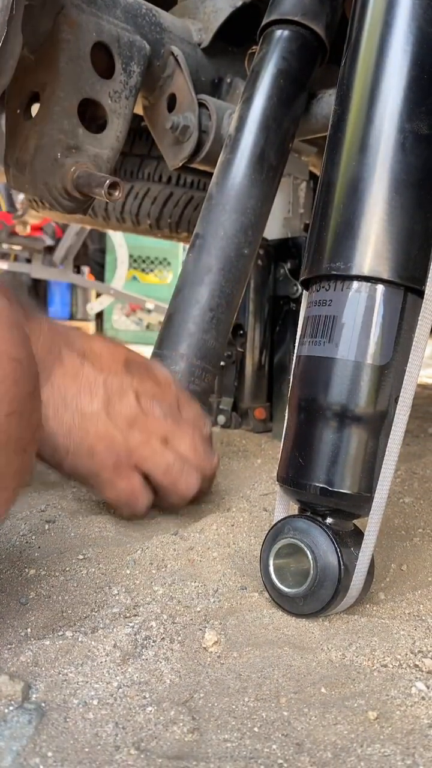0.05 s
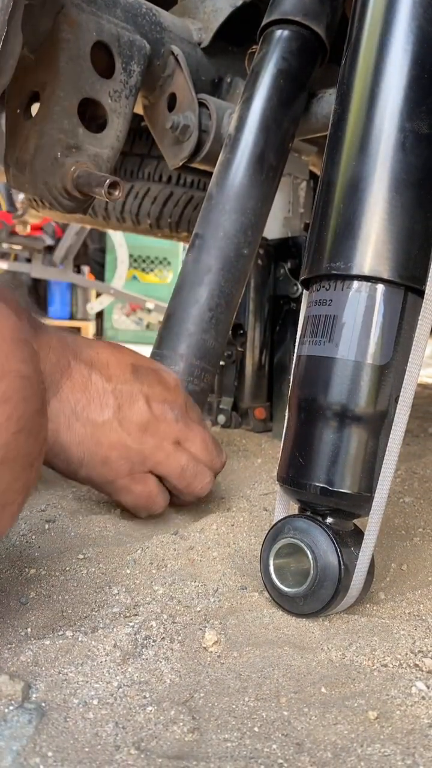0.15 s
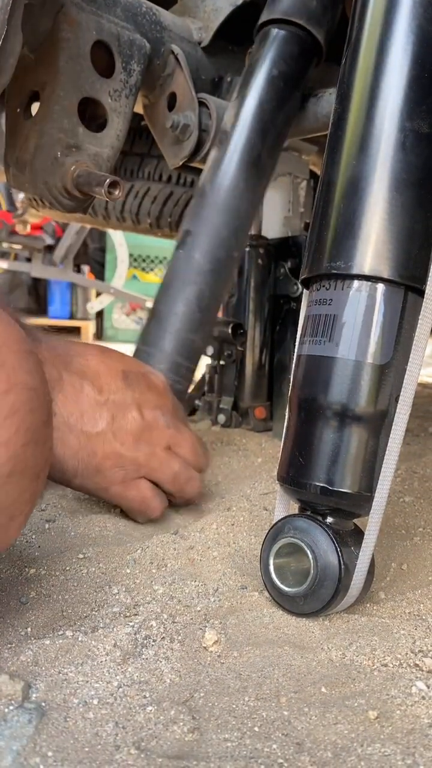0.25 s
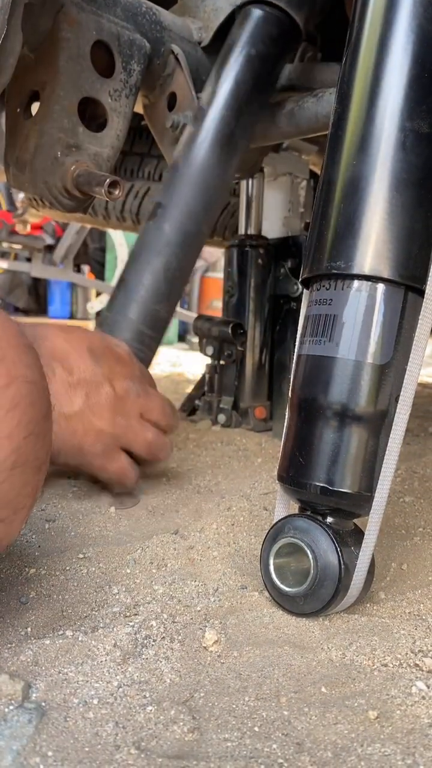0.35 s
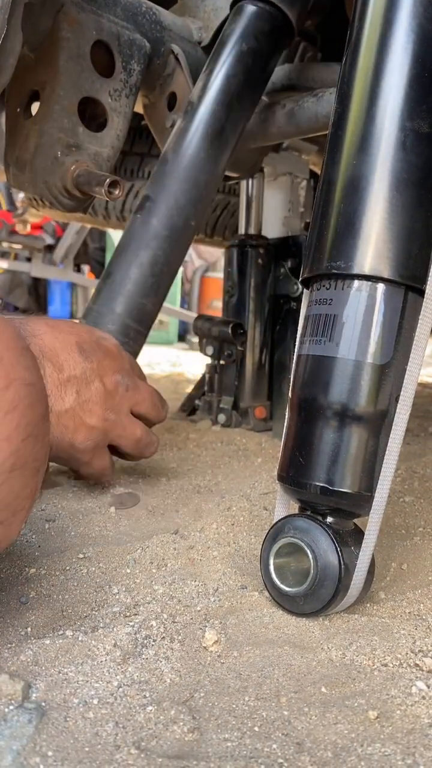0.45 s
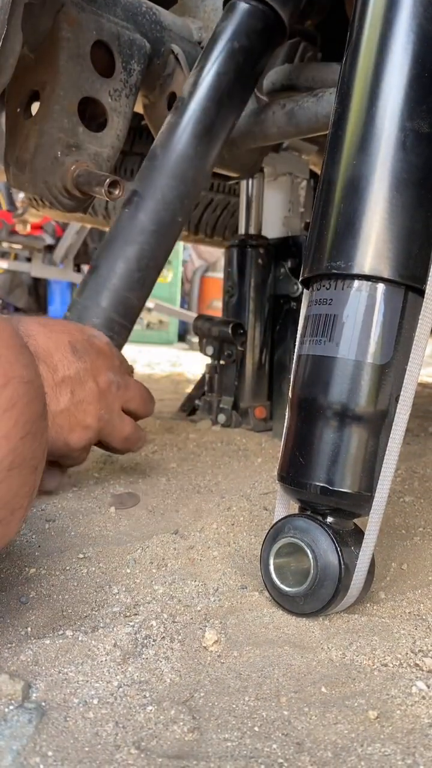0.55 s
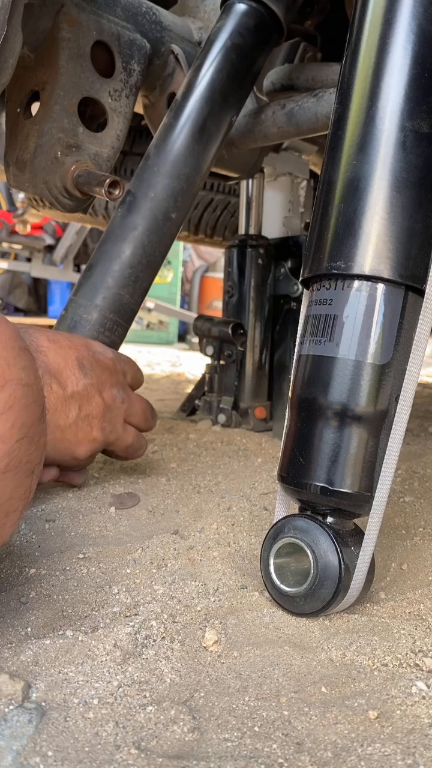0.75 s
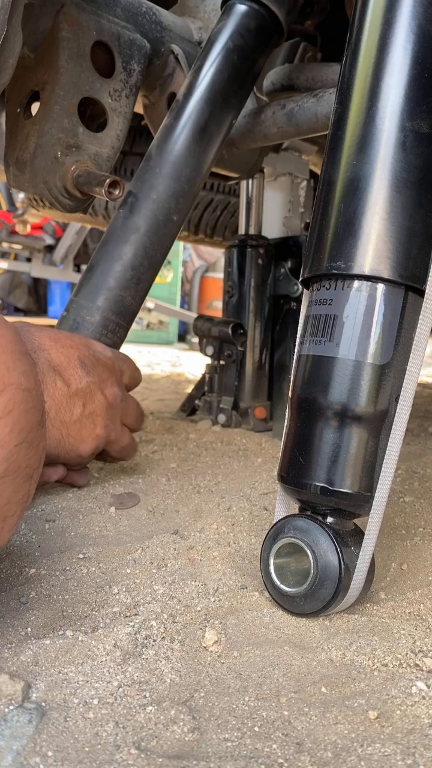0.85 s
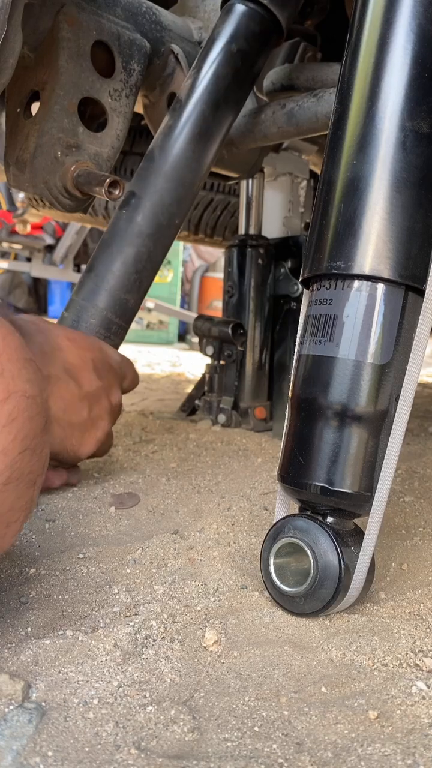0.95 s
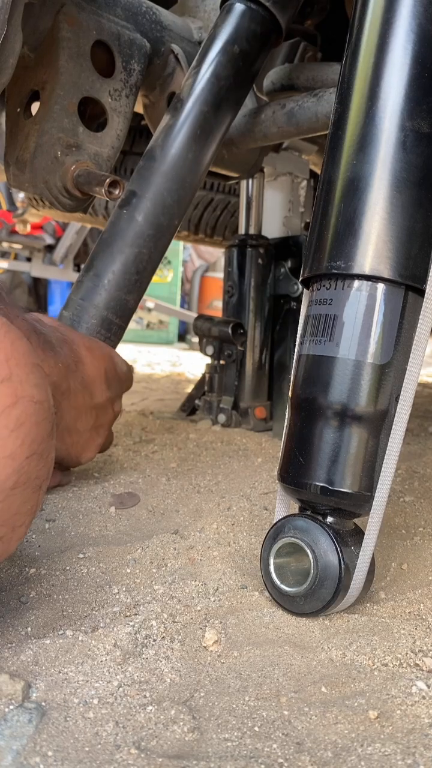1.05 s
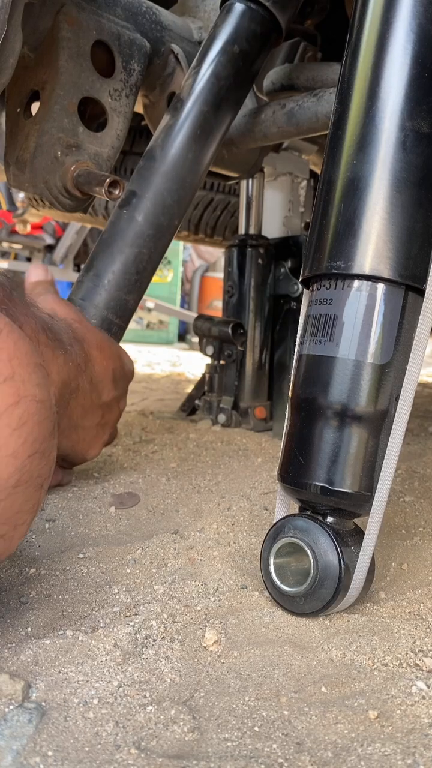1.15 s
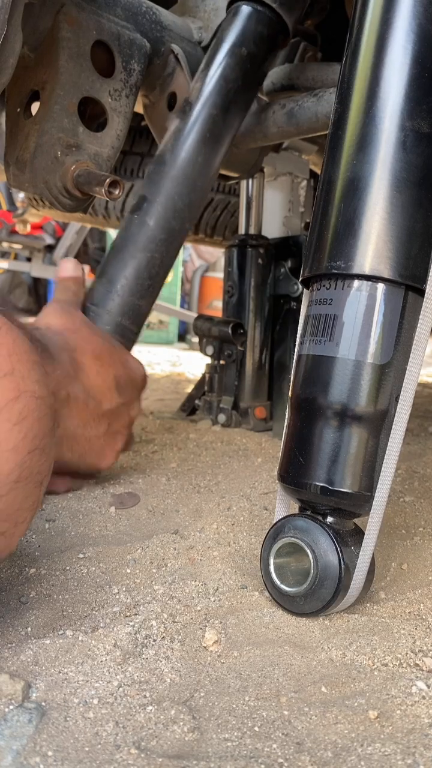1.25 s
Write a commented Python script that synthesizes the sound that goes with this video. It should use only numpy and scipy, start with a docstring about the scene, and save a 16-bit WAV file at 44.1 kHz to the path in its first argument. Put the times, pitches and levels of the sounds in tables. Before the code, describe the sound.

A steel shock absorber clanks loudly once, then taps lightly twice.

```python
"""Shock absorber under a parked vehicle

Close up on a phone's microphones, a steel shock absorber is swung by hand: it rubs and bumps in its
mount, hits home with a loud clank, then taps twice, first ringing freely, then damped by the grip.
The underbody throws back a short echo. The hand brushes sandy ground, grit ticks, a far engine drones."""
import sys
import numpy as np
from scipy import signal
from scipy.fft import rfft, irfft, next_fast_len
from scipy.io import wavfile
from scipy.ndimage import map_coordinates

SR = 44100
rng = np.random.default_rng(int(sys.argv[2]) if len(sys.argv) > 2 else 0)


def dump(signal):
    """Clip the signal to [-1, 1] and save it as 16-bit WAV at the path in sys.argv[1]."""
    limited = np.clip(np.atleast_2d(signal).T, -1, 1)
    pcm = np.round(limited * 32767).astype(np.int16)
    wavfile.write(sys.argv[1], SR, pcm)


N = 57330

# outdoor rumble: freq_hz, gain_db
AIR_COLOUR = [(20, -21), (38, 0.5), (60, 3.5), (120, 0), (170, -6), (250, -10.5), (400, -26), (700, -56),
              (1200, -40.5), (2500, -53), (6000, -53.5), (16000, -60.5)]
# tones of the far engine: pitch_hz, level_db
ENGINE_TONES = [(55, -56), (82, -39.5), (110, -47.5), (236, -55)]
# the hand brushing the ground: time_s, level_db
BRUSH_LEVEL = [(0, -47.5), (.08, -56), (.17, -52), (.26, -56.5), (.45, -68.5), (.58, -71.5), (.76, -67),
               (.93, -68), (1.06, -59.5), (1.13, -58), (1.2, -71.5), (1.3, -56)]
# hiss of the sand: freq_hz, gain_db
SAND_COLOUR = [(500, -0.5), (2000, -3), (4000, -3.5), (7000, 1.5), (10000, 0), (13000, -0.5), (15500, -8.5),
               (17000, -27)]
# ticks of grit: start_s, level_db, pitch_hz
GRIT_TICKS = [(0.0208, -33.5, 12200), (0.0306, -23.5, 15000), (.154, -42.5, 2150), (0.1662, -39, 11000),
              (.456, -45, 6950), (0.529, -33, 2720), (0.5309, -35.5, 4810), (0.5339, -30.5, 10100),
              (0.8946, -45, 6000), (1.0342, -38.5, 5570), (1.0561, -41.5, 9300), (1.161, -43.5, 5700),
              (1.2503, -35, 5840)]
# the tube rubbing in its mount: time_s, level_db
RUB_LEVEL = [(0, -56.5), (.14, -57.5), (.2, -40.5), (.26, -39), (.39, -35), (.47, -48), (.52, -52.5),
             (.7, -55.5), (1.3, -58.5)]
# its low grumble: freq_hz, gain_db
RUB_COLOUR = [(100, -17.5), (275, 3.5), (420, 0), (720, -10), (900, -15.5), (1150, -17.5), (1500, -18.5),
              (3200, -24), (6000, -33), (12000, -48.5)]
# steel striking steel: start_s, level_db, tilt_db_per_octave, t60_s
CLANKS = [(.2224, -35.5, -9.5, 0.19), (0.327, -11, 7.5, 0.036), (0.3306, -10.5, -0.5, 0.036),
          (0.3432, -26.5, 12, .075), (.347, -23, -6, 0.13)]
# resonances of the clank: freq_hz, gain_db
CLANK_COLOUR = [(300, -13.5), (650, 3.5), (860, -12), (1120, 4.5), (1450, -12.5), (2220, 8), (2700, 0.5),
                (3200, 12.5), (3650, -1.5), (4300, -2), (5300, 0.5), (5950, 6), (6900, -8.5), (8200, -6),
                (9000, -17), (10500, -28), (12000, -18), (13200, -58.5)]
# the eye catching on its bolt before the loud clank: start_s, level_db, t60_s
CATCHES = [(0.2773, -26.5, .024), (0.2795, -29.5, 0.053), (0.284, -30.5, 0.11)]
# resonances of the catch: freq_hz, gain_db
CATCH_COLOUR = [(500, 1), (1200, -3.5), (2000, -28), (3100, -4), (3750, 2.5), (4400, -11.5), (5700, -9),
                (7500, -17), (9500, -20.5), (12000, -32.5), (15000, -44.5)]
# single steel modes that stand out: start_s, pitch_hz, level_db, t60_s
PINGS = [(.223, 4640, -44, 0.1), (0.2297, 715, -22.5, 0.036), (.2802, 3720, -17, .026),
         (0.3104, 701.4, -16.5, 0.038), (.3303, 2920, -52, 0.44), (.3303, 1527, -64, 4.2)]
# dull bumps in the mount: start_s, level_db, contact_s, relative_ring_db
BUMPS = [(0.23, -23, 0.00053, -11.5), (.2812, -17.5, 0.00058, -4.5), (.296, -18.5, 0.0011, -16.5),
         (0.3112, -8, 0.0006, -12.5), (0.3238, -13, .0011, -22.5), (0.3304, -21.5, 0.0012, -17)]
# dead thump of a bump: freq_hz, gain_db
THUMP_COLOUR = [(80, -35.5), (180, -16), (300, 21.5), (480, 1.5), (720, 1), (840, -16), (1130, -7),
                (1500, -11), (3000, -13.5), (6000, -37.5), (12000, -35)]
# modes of mount and chassis: pitch_hz
CHASSIS_PITCHES = [236, 272, 307, 333, 434, 477, 543, 585, 645, 715, 1085, 1145]
# those modes, in the same order: level_db, t60_s
CHASSIS_DECAYS = [(-11, 0.33), (-9, 0.5), (-3.5, 0.21), (-1.5, .2), (-30, 0.076), (-4, 0.086),
                  (-13.5, 0.12), (-19, .42), (-16, 0.24), (-9, 0.087), (-13.5, 0.24), (-14.5, 0.33)]
# light ringing taps: start_s, ring_db, clack_db, tilt_db_per_octave
FREE_TAPS = [(.6115, -42.5, -32, -2), (.6162, -36, -33.5, 0)]
# modes of the free tube and its hollow body: pitch_hz, level_db, t60_s
FREE_TUBE = [(1109, -15, 0.3), (1187, 6, 0.07), (1598, -16.5, 0.37), (1871, -0.5, 0.051), (2340, -15, 0.1),
             (3149, -7.5, 0.094), (3366, -1, 0.2), (5136, -5, .065), (5610, -13.5, 0.14)]
FREE_HOLLOW = [(342, -1.5, 0.051)]
# taps damped by the grip: start_s, ring_db, clack_db, tilt_db_per_octave
HELD_TAPS = [(.9775, -37, -32, 1.5), (.9822, -34, -38, -1.5), (.9925, -39, -36.5, -4)]
# modes of the gripped tube and its hollow body: pitch_hz, level_db, t60_s
HELD_TUBE = [(1085, -5.5, 0.045), (1162, 3.5, 0.028), (1448, -0.5, 0.044), (1750, -12, 0.047),
             (1896, -3, 0.026), (2946, -18.5, 0.1), (3800, 6, 0.015)]
HELD_HOLLOW = [(309, -8, 0.17)]
# clack of a tap's contact: freq_hz, gain_db
CLACK_COLOUR = [(200, -11), (330, 3.5), (600, -4.5), (900, -19), (1130, 6), (1900, -2.5), (2500, -9),
                (3750, 1), (4600, -7.5), (5500, -0.5), (7000, -11.5), (9500, -12), (12500, -30),
                (15500, -39.5)]
# short slides of steel on steel: middle_s, half_length_s, level_db
SCRAPES = [(0.644, 0.02, -54.5), (1.015, 0.026, -51.5), (1.101, 0.007, -54.5)]
# their rasp: freq_hz, gain_db
SCRAPE_COLOUR = [(900, 7), (1500, 6), (3300, -4.5), (5000, 2), (6500, -17), (14000, -42)]
# decay of the echo under the vehicle: freq_hz, t60_s
ECHO_DECAY = [(200, 0.37), (500, 0.23), (3000, 0.18), (7000, 0.089), (14000, 0.083)]
# the echo's mid (common to both channels) and side (opposed): freq_hz, gain_db
ECHO_MID = [(300, -1.5), (700, -4), (1200, -4.5)]
ECHO_SIDE = [(160, -20), (330, -11), (600, -4), (1200, -3), (2200, -15)]
# phase of the left channel ahead of the right, from the phone's stereo processing: freq_hz, lead_rad
LEFT_LEAD = [(100, 0), (400, -.45), (1600, -.4), (2300, .5), (5200, .45), (6200, 1.9), (7350, 3.14),
             (8800, 4.3), (10100, 6.2), (11000, 6.4), (13400, 9.4), (15800, 12.4)]
# level of the left channel against the right: freq_hz, gain_db
LEFT_BALANCE = [(90, 0), (280, -2.9), (600, -3), (1100, -.7), (2000, 0)]
# the microphones' roll-off at both ends: freq_hz, gain_db
MIC_RESPONSE = [(18, -38.5), (26, -17.5), (36, 0), (15500, 0.5), (16600, -14)]

TIME_S = np.arange(N) / SR


def amp(db):
    """Decibels to gain."""
    return 10 ** (np.asarray(db) / 20)


def unit(x):
    """Scale to rms 1."""
    return x / np.sqrt(np.mean(x ** 2) + 1e-20)


def along(points, hz):
    """Read (freq_hz, value) points on a log axis."""
    freqs, values = np.transpose(points)
    return np.interp(np.log(hz + 1), np.log(freqs + 1), values)


def fader(points):
    """Gain at every sample from (time_s, level_db) points."""
    return amp(np.interp(TIME_S, *np.transpose(points)))


def wobble(rate_hz):
    """A smooth random curve with rate_hz knots a second."""
    knots = rng.standard_normal(int(N * rate_hz / SR) + 4)
    return map_coordinates(knots, [TIME_S * rate_hz])


def filtered(x, response):
    """Pass x through a response given as a function of frequency."""
    size = next_fast_len(N + SR // 2)
    return irfft(rfft(x, size) * response(np.fft.rfftfreq(size, 1 / SR)), size)[..., :N]


def noise(colour, tilt_db=0):
    """Noise of rms 1 in a colour, tilted by tilt_db per octave."""
    white = rng.standard_normal(N)
    return unit(filtered(white, lambda hz: amp(along(colour, hz) + tilt_db * np.log2(hz + 100))))


def decay(start_s, t60_s, attack_s=0.00078):
    """Quick rise at start_s, then exponential decay."""
    age_s = np.maximum(TIME_S - start_s, 0)
    return (1 - np.exp(-age_s / attack_s)) * amp(-60 * age_s / t60_s)


def ring(modes, start_s, contact_s=0, scatter_db=1):
    """A blow feeds modes in phase with what already rings; a long contact weakens the high ones."""
    out = np.zeros(N)
    for hz, db, t60_s in modes:
        gain = amp(db + scatter_db * rng.standard_normal()) / (1 + (hz * contact_s) ** 2)
        out += gain * decay(start_s, t60_s, attack_s=0.00099) * np.sin(2 * np.pi * hz * TIME_S)
    return out


def background(air_db=-38):
    """Low outdoor rumble and, far off, the wavering drone of an engine."""
    engine = np.zeros(N)
    for hz, db in ENGINE_TONES:
        gain = amp(db + 0.58 * wobble(7.1))
        engine += gain * unit(np.sin(2 * np.pi * hz * TIME_S + 0.52 * wobble(5.86)))
    return engine + amp(air_db) * noise(AIR_COLOUR)


def sand():
    """The hand brushes sandy ground: a hiss with a fine and a coarse grain."""
    return fader(BRUSH_LEVEL) * unit(noise(SAND_COLOUR) * amp(4.2 * wobble(700) + 2.8 * wobble(89)))


def rub():
    """The tube grumbles unevenly as it turns in the mount."""
    return fader(RUB_LEVEL) * unit(noise(RUB_COLOUR) * amp(2.7 * wobble(70)))


def grit(width_octaves=0.65):
    """Single grains tick, each a tiny burst of noise around its own pitch."""
    out = np.zeros(N)
    for start_s, db, pitch_hz in GRIT_TICKS:
        white = rng.standard_normal(N)
        tick = filtered(white, lambda hz: (1 + (np.log2((hz + 1) / pitch_hz) / width_octaves) ** 2) ** -2)
        out += amp(db) * unit(tick) * decay(start_s, t60_s=0.008, attack_s=0.00052)
    return out


def clank():
    """The eye catches, slams home and chatters: steel modes so dense and short they sound as noise."""
    catch = sum(amp(db) * noise(CATCH_COLOUR) * decay(start_s, t60_s) for start_s, db, t60_s in CATCHES)
    strikes = sum(amp(db) * noise(CLANK_COLOUR, tilt_db) * decay(start_s, t60_s)
                  for start_s, db, tilt_db, t60_s in CLANKS)
    return catch + strikes


def pings():
    """Single modes of the steel ring out of a contact."""
    return sum(ring([(hz, db, t60_s)], start_s) for start_s, hz, db, t60_s in PINGS)


def bumps(push_db=4, thump_db=-2, gap_hz=857, gap_q=3.6):
    """Each bump in the mount is one push and a dead thump, and rings the chassis."""
    modes = [(hz, db, t60_s) for hz, (db, t60_s) in zip(CHASSIS_PITCHES, CHASSIS_DECAYS)]
    out = np.zeros(N)
    for start_s, db, contact_s, ring_db in BUMPS:
        from_peak = (TIME_S - start_s - 0.0016) / contact_s
        push = (1 - 2 * from_peak ** 2) * np.exp(-from_peak ** 2)
        thump = noise(THUMP_COLOUR) * decay(start_s, t60_s=0.047, attack_s=0.00073)
        chassis = ring(modes, start_s, contact_s)
        out += amp(db) * (amp(push_db) * push + amp(thump_db) * thump + amp(ring_db) * chassis)
    # the mount hardly radiates between its low and its upper modes
    return signal.lfilter(*signal.iirnotch(gap_hz, gap_q, SR), out)


def taps(contacts, modes, clack_t60_s, pivot_hz=2000):
    """A tap clacks and rings the tube; a harder contact tilts both towards the treble."""
    out = np.zeros(N)
    for start_s, ring_db, clack_db, tilt_db in contacts:
        tilted = [(hz, db + tilt_db * np.log2(hz / pivot_hz), t60_s) for hz, db, t60_s in modes]
        out += amp(ring_db) * ring(tilted, start_s)
        out += amp(clack_db) * noise(CLACK_COLOUR, tilt_db) * decay(start_s, clack_t60_s)
    return out


def singing(pitch_hz=2930, level_db=-45, beat_hz=10.4, beat_depth=0.58, first_dip_s=0.636):
    """After the ringing tap the tube sings on, swelling and dipping as two close modes beat."""
    t = TIME_S - first_dip_s
    pair = np.sin(2 * np.pi * pitch_hz * t) - beat_depth * np.sin(2 * np.pi * (pitch_hz + beat_hz) * t)
    return amp(level_db) * decay(start_s=FREE_TAPS[-1][0], t60_s=0.59) * pair


def scrapes():
    """Rough, brief slides of the tube in its mount."""
    strokes = sum(amp(db) * np.exp(-((TIME_S - middle_s) / half_s) ** 2)
                  for middle_s, half_s, db in SCRAPES)
    return strokes * unit(noise(SCRAPE_COLOUR) * amp(3.5 * wobble(300)))


def underbody_echo(source, level_db=-7.5, build_s=0.0018):
    """A short stereo echo between ground and chassis, widest in the midrange; the treble dies first."""
    hz, t, spectra = signal.stft(rng.standard_normal((2, SR // 2)), SR, nperseg=256)
    fade = amp(-60 * t / along(ECHO_DECAY, hz)[:, None])
    tail = signal.istft(spectra * fade, SR, nperseg=256)[1]
    tail *= 1 - np.exp(-np.arange(tail.shape[1]) / SR / build_s)
    mid, side = signal.fftconvolve(source[None], tail / np.linalg.norm(tail[0]), axes=1)[:, :N]
    mid = filtered(mid, lambda hz: amp(along(ECHO_MID, hz)))
    side = filtered(side, lambda hz: amp(along(ECHO_SIDE, hz)))
    return amp(level_db) * np.array([mid + side, mid - side])


def scene(low_cut_hz=239):
    """Under the vehicle: steel and its echo close by, sand on the ground, the engine in the distance."""
    free_taps = taps(FREE_TAPS, FREE_TUBE + FREE_HOLLOW, clack_t60_s=0.045)
    held_taps = taps(HELD_TAPS, HELD_TUBE + HELD_HOLLOW, clack_t60_s=0.054)
    metal = bumps() + clank() + pings() + rub() + scrapes() + free_taps + held_taps
    # the metal sounds carry little deep bass
    metal = signal.sosfilt(signal.butter(2, low_cut_hz, "high", fs=SR, output="sos"), metal)
    return metal + underbody_echo(metal) + singing() + sand() + grit() + background()


def record(dry, top_hz=16600):
    """A phone's stereo processing widens the treble by phase; the low mids lean right, both ends roll off."""
    sides = np.array([[0.5], [-0.5]])  # left, right

    def response(hz):
        phase = np.exp(1j * sides * along(LEFT_LEAD, hz))
        gain = amp(sides * along(LEFT_BALANCE, hz) + along(MIC_RESPONSE, hz))
        return phase * gain * (hz < top_hz)

    return filtered(dry, response)


dry = scene()
out = record(dry)
dump(out)
```